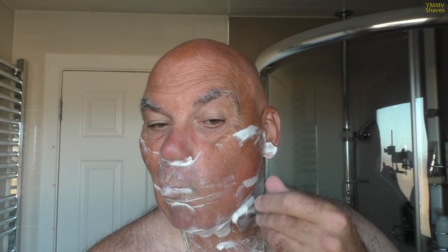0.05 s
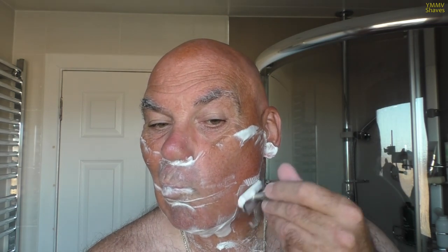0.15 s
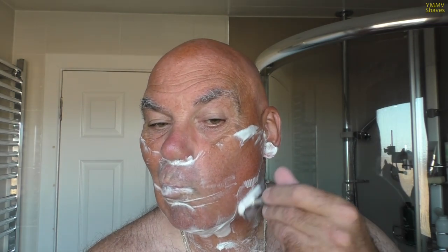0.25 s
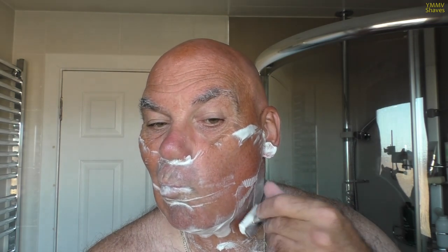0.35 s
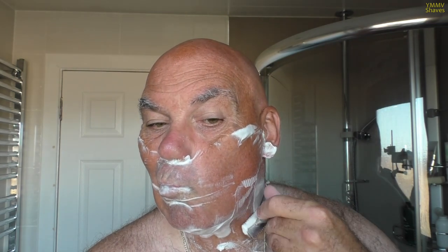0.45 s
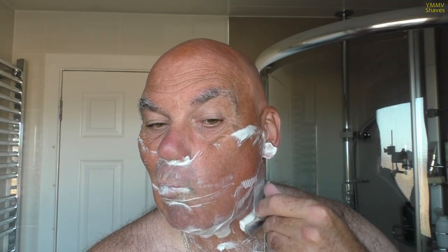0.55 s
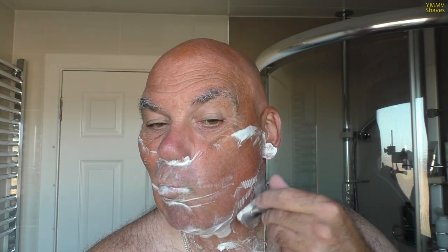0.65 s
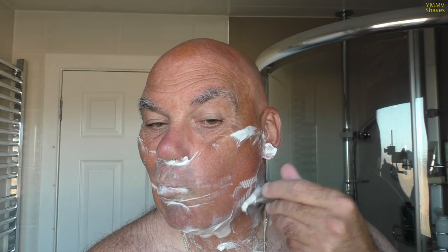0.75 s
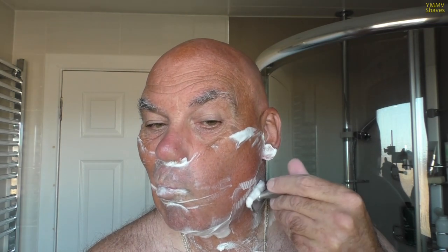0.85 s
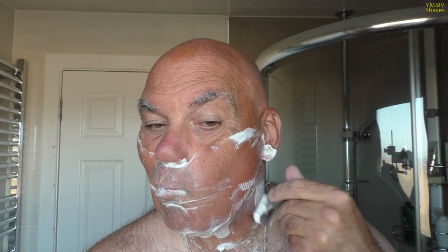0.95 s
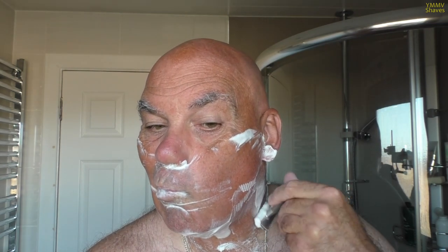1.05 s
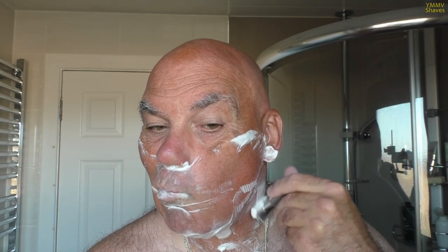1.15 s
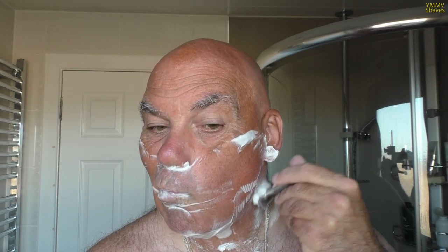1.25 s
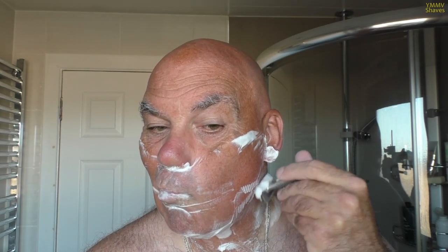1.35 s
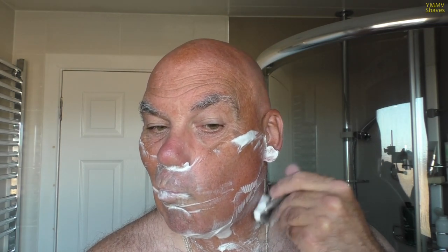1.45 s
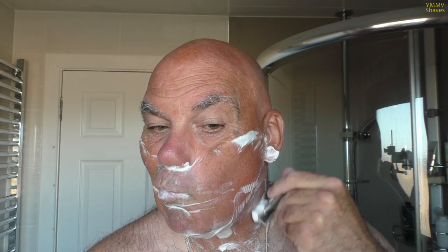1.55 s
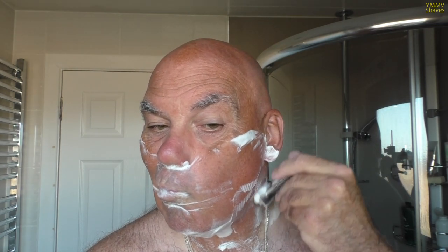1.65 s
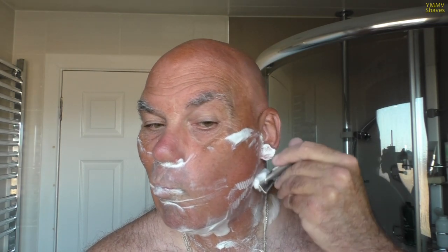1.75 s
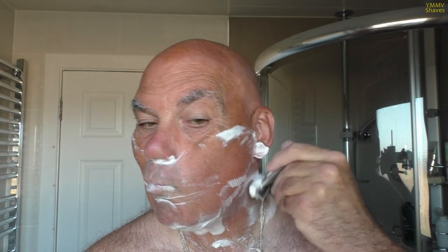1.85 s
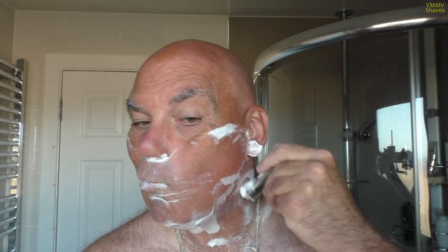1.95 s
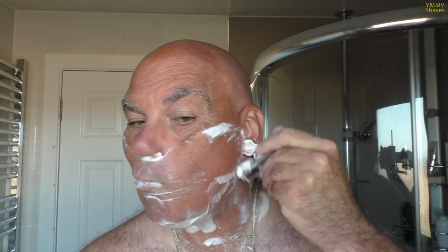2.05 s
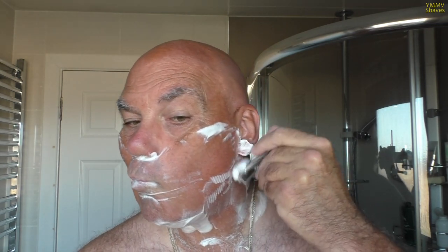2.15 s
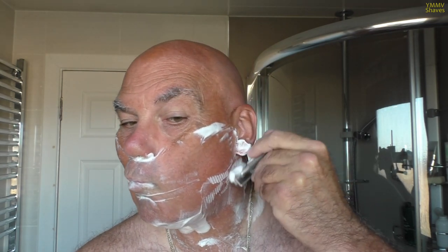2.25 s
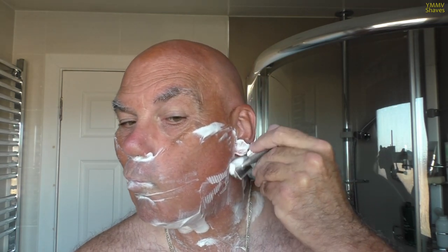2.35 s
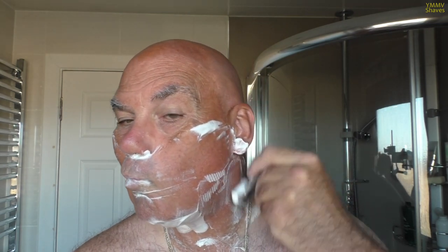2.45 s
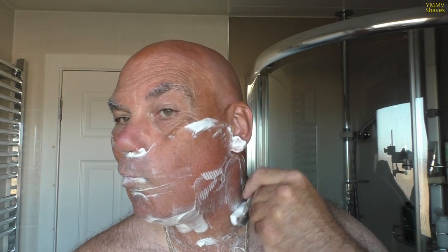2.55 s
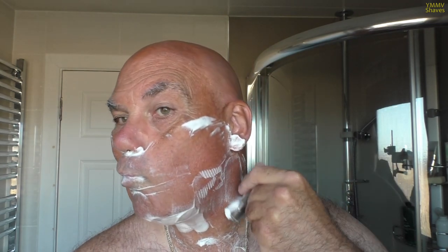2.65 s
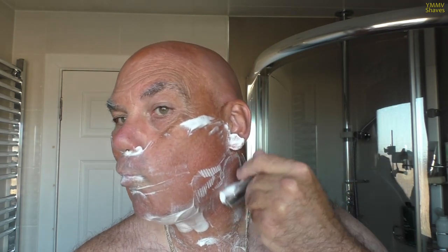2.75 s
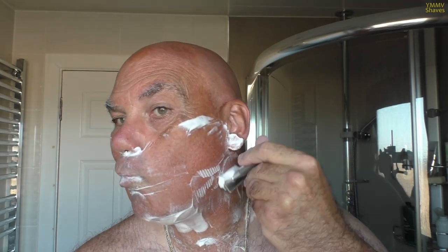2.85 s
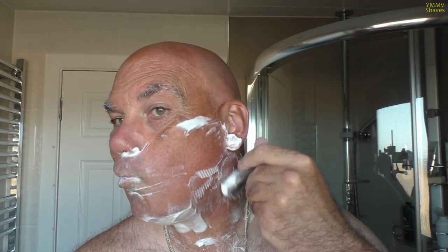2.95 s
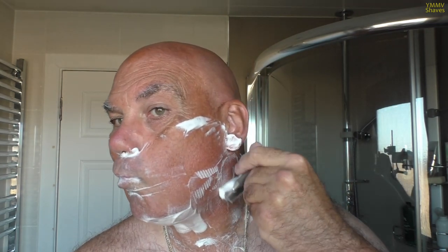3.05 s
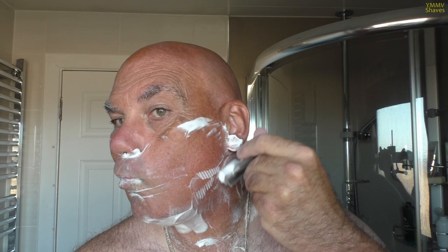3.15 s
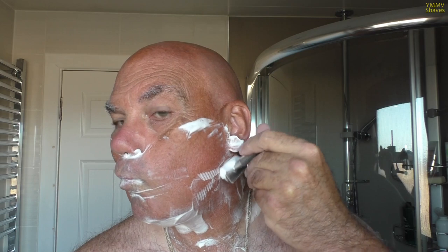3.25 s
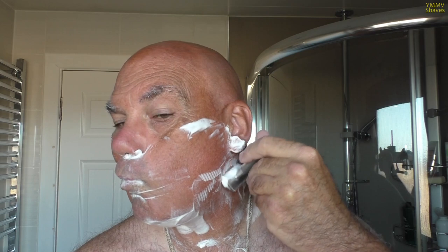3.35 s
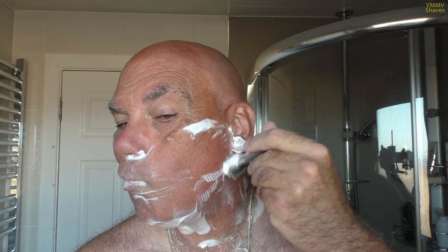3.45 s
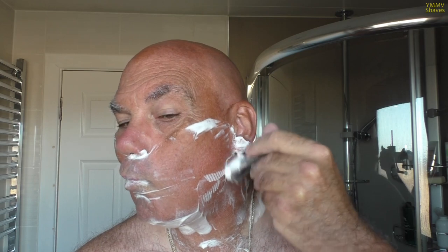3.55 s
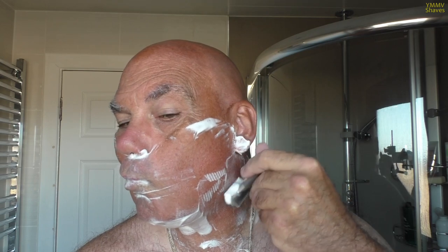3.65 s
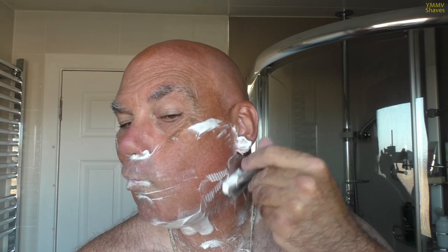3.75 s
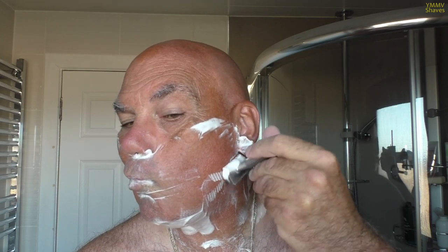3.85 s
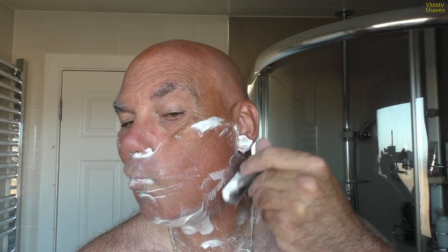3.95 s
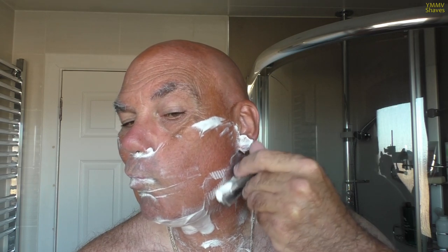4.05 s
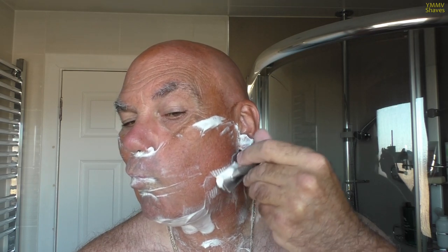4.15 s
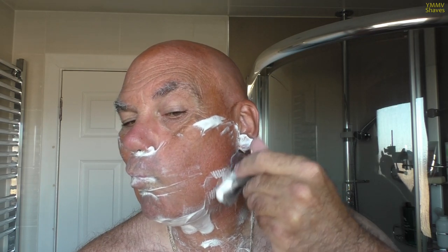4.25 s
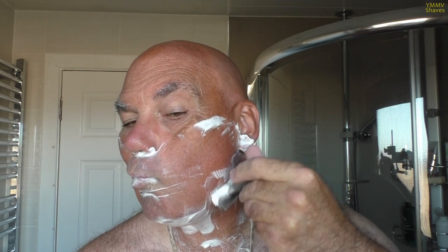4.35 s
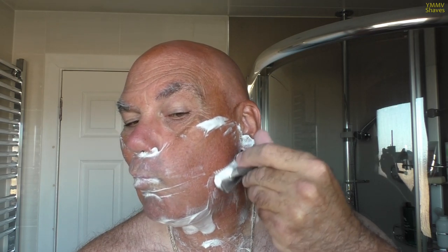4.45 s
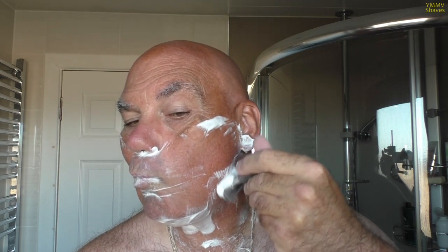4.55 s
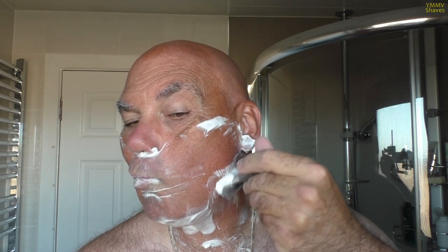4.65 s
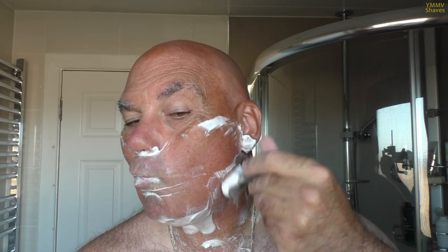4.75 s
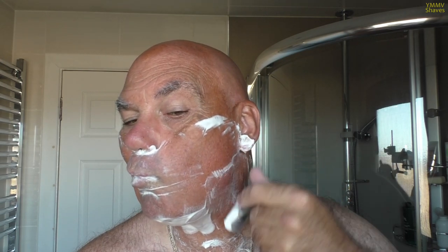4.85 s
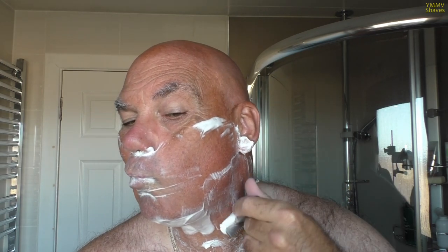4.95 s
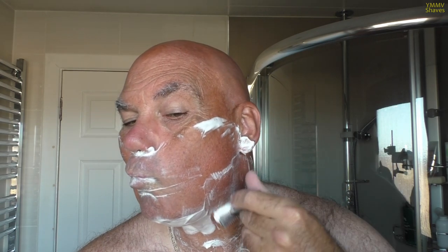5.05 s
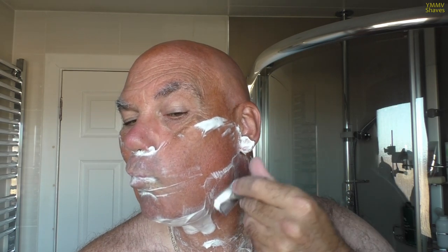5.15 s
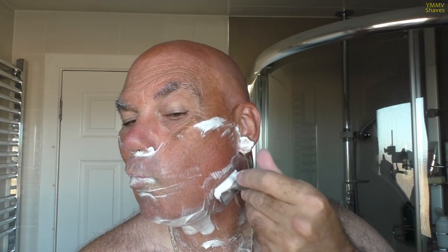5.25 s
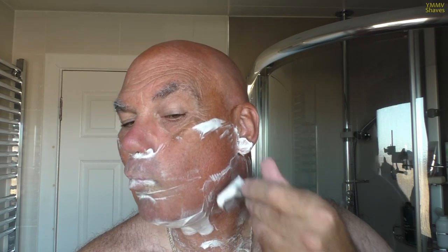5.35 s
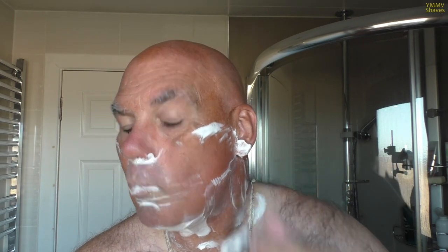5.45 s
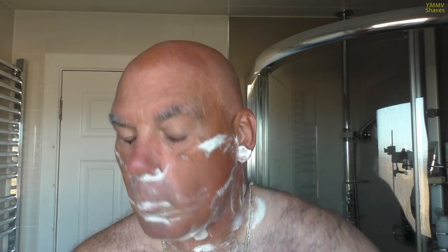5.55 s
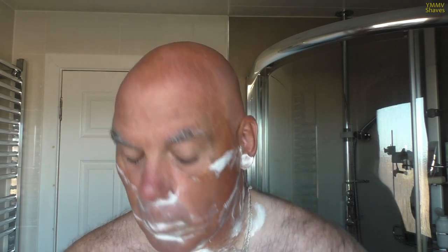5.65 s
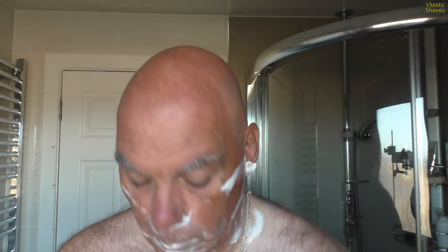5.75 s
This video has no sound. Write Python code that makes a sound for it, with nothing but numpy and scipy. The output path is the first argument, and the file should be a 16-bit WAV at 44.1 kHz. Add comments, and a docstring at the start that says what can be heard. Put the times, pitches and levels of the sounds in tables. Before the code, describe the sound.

A razor scrapes lathered stubble in short strokes over a low hum, then a tap runs with a pipe knock.

```python
"""Wet shave in a tiled bathroom

Over a low ventilation hum, a safety razor scrapes through lathered stubble in short strokes.
Hairs snap in a dense crackle that rings the blade, and the lather smacks as the razor lands and lifts.
At the end a tap is opened: the valve whistles, the pipe knocks and water drums into the basin."""
import sys
import numpy as np
from scipy import signal
from scipy.fft import rfft, irfft
from scipy.io import wavfile

SR = 44100
rng = np.random.default_rng(int(sys.argv[2]) if len(sys.argv) > 2 else 0)


def master(y):
    """Save y as 16-bit WAV."""
    cut = np.clip(np.atleast_2d(y).T, -1, 1)
    pcm = np.round(cut * 32767)  # scale
    wavfile.write(sys.argv[1], SR, pcm.astype(np.int16))


N = 256220
TIME = np.arange(N) / SR


def amp(db):
    """Amplitude ratio: a factor of ten for every 20 dB."""
    return 10 ** (np.asarray(db) / 20)


def unit_rms(x):
    """Normalisation to unit mean power."""
    return x / np.sqrt(np.mean(x ** 2) + 1e-20)


def value_at(curve, hz):
    """Interpolation on a logarithmic frequency axis."""
    f, value = np.transpose(curve)
    return np.interp(np.log(hz + 1), np.log(f + 1), value)


def add(mix, start_s, sound):
    """Superposition: a sound adds to the mix from its onset."""
    part = mix[round(start_s * SR):][:len(sound)]
    part += sound[:len(part)]


def colour(x, spectrum, tilt_db=0, size=4096):
    """Minimum-phase filtering at unit energy, with a treble tilt in dB per octave."""
    hz = abs(np.fft.fftfreq(size, 1 / SR))
    log_gain = np.log(amp(value_at(spectrum, hz) + tilt_db * np.log2(1 + hz / 1000)))
    taps = np.fft.ifft(np.exp(np.conj(signal.hilbert(log_gain)))).real
    return signal.fftconvolve(x, taps / np.linalg.norm(taps))[:len(x)]


def wander(cutoff_hz):
    """Low-passed noise: a smooth random fluctuation of unit power."""
    hz = np.fft.rfftfreq(N, 1 / SR)
    return unit_rms(irfft(rfft(rng.standard_normal(N)) / (1 + (hz / cutoff_hz) ** 4), N))


def crackle(per_s, spread_db):
    """Shot noise: impulses at random moments, most small and a few large."""
    size = amp(spread_db * np.minimum(rng.exponential(1, N), 4))
    return unit_rms(size * rng.choice([-1, 1], N) * (rng.random(N) < per_s / SR))


def resonate(x, hz, width_hz):
    """Forced resonance: two equal two-pole stages in cascade, scaled to unit power."""
    radius = np.exp(-np.pi * width_hz / SR)
    zeros, poles = [1, 0, -1], [1, -2 * radius * np.cos(2 * np.pi * hz / SR), radius ** 2]
    return unit_rms(signal.lfilter(zeros, poles, signal.lfilter(zeros, poles, x)))


def ring(modes, t):
    """Free vibration: damped modes sum after a blow, scaled to unit peak."""
    sound = sum(amp(db) * np.exp(-np.log(1000) * t / t60) * np.sin(2 * np.pi * hz * t)
                for hz, db, t60 in modes)
    return sound / abs(sound).max()


# Reverberation time of the room: f/Hz, T60/s
ROOM_DECAY = [(200, 0.89), (1000, 0.3), (4000, 0.3), (9000, 0.36), (16000, 0.26)]

def bathroom(x, wet_db):
    """Reverberation: dense reflections off tile and glass, the bass lasting longest."""
    count = SR // 2
    reflections = rng.standard_normal(count) * (rng.random(count) < 5000 / SR) * (TIME[:count] > 0.003)
    hz, t, spectra = signal.stft(reflections, SR, nperseg=256)
    decay = np.exp(-np.log(1000) * t / value_at(ROOM_DECAY, hz)[:, None])
    tail = signal.istft(spectra * decay, SR)[1]
    wet = signal.fftconvolve(x, tail / np.linalg.norm(tail))[:N]
    return (x + amp(wet_db) * wet) / np.sqrt(1 + amp(wet_db) ** 2)


# Spectra of the ventilation hum and of the hiss above it: f/Hz, relative level/dB
HUM_SPECTRUM = [(12, -62), (20, -26), (188, 0), (232, 0), (298, -1.5), (394, -5.5), (463, -13),
                (578, -30.5), (680, -41.5), (880, -51.5), (1500, -120)]
HISS_SPECTRUM = [(450, -21.5), (700, 1), (1000, 1), (1850, 1.5), (2150, -2), (2400, 2), (2750, -7),
                 (3000, 1), (3500, -8), (4800, -5.5), (6100, -8), (10000, -1.5), (12500, -4.5),
                 (16000, -8.5)]

def ventilation():
    """Flow noise: air rumbles in the ventilation, wavering slightly under a faint even hiss."""
    hum = colour(rng.standard_normal(N), HUM_SPECTRUM) * amp(1.27 * wander(cutoff_hz=9.2))
    hiss = bathroom(colour(rng.standard_normal(N), HISS_SPECTRUM), wet_db=-11)
    return amp(-52) * hum + amp(-66.5) * hiss


# Spectra of snapping hair, fizzing lather and dragging skin: f/Hz, relative level/dB
RASP_SPECTRUM = [(1500, -40.5), (2100, -36), (2650, -4.5), (3050, 0.5), (3750, 1), (4300, 3.5), (4950, 3),
                 (5500, -2), (6300, -2), (7500, -12.5), (10000, -27), (16000, -35)]
FIZZ_SPECTRUM = [(2500, -35), (5000, -6.5), (6900, 1.5), (7600, 0.5), (8400, 0), (9100, -0.5), (10200, 0.5),
                 (11200, -3), (12500, -5), (14000, -13), (16000, -9.5)]
DRAG_SPECTRUM = [(300, -45), (700, -14.5), (1100, -4), (1500, 0.5), (1900, -2), (2350, 5.5), (2700, 4),
                 (3500, -31), (8000, -55)]
# Strokes: landing t/s, pressing t/s, easing t/s, level/dB, swell/dB, sag/dB, bite/dB, fizz gain/dB,
# fall of fizz/dB, drag gain/dB, blade gain/dB, head resonance f/Hz, head gain/dB
RAZOR_STROKES = [ (0.053, 0.049, 0.044, -45.5, 9, 4, 1, -1.5, 10, -13, -18, 5800, -14),
                 (0.580, 0.13, 0.12, -48, 13.5, 6.5, 1.5, -4, 5, -17.5, -11.5, 3150, -13),
                 (1.135, .118, 0.037, -51, 20.5, 0, 1, -4, 5, -12.5, -17, 2600, -7),
                 (1.574, 0.082, 0.08, -51, 19.5, 2, 0.5, -3, 11, -5.5, -24, 1870, -14),
                 (1.986, 0.1, 0.026, -50, 3.5, 3, 3.5, -2, 2, -16, -19, 5300, -12),
                 (2.268, 0.051, 0.017, -49.5, 24, 3, 1, -4.5, 3, -9.5, -24, 6050, -9),
                 (2.627, 0.15, 0.075, -55, 15.5, 4, -0.5, 2.5, -8, -6.5, -29, 2050, -16),
                 (3.076, .108, 0.019, -49.5, 7.5, 4, 0.5, -5, 8, -10.5, -11, 4200, -17),
                 (3.395, 0.056, 0.025, -46.5, 18.5, 4, 1.5, -6.5, -4, -12, -15, 5030, -14),
                 (3.738, 0.085, 0.014, -49, 5, 8, 2.5, -2.5, 6, -13, -6, 4360, -10),
                 (4.055, 0.064, 0.081, -52.5, 7.5, 6.5, 0.5, -5.5, 7, -7, -16, 4500, -40),
                 (4.357, .110, 0.013, -51.5, 8.5, 5, 3, -4, 6, -10, -6.5, 2660, -8),
                 (4.674, 0.017, 0.0094, -58.5, 8, 4, 1, 0.5, 13, -7.5, -10, 5050, -24),
                 (5.003, 0.1, 0.14, -47.5, 19, 3.5, 3, -0.6, 12.5, -11, -13, 4830, -23), ]

def razor(attack_s=0.0043, release_s=0.022, bite_s=0.019, touch_s=0.012, glide_s=0.17):
    """Fracture and friction: snapping hairs ring blade and head, skin drags and lather fizzes."""
    clumps = amp(0.81 * wander(cutoff_hz=100))
    hairs = unit_rms(clumps * crackle(per_s=3000, spread_db=1.5))
    rasp = amp(-1.5) * colour(hairs, RASP_SPECTRUM)
    fizz = colour(unit_rms(clumps * crackle(per_s=6600, spread_db=2.5)), FIZZ_SPECTRUM)
    drag = amp(1.5) * colour(crackle(per_s=2500, spread_db=4.5), DRAG_SPECTRUM)
    skim = rasp + amp(-2) * fizz + amp(-6.5) * drag
    blade = resonate(hairs, hz=3826, width_hz=330)
    out = np.zeros(N)
    for (start_s, press_s, ease_s, db, swell_db, sag_db, bite_db,
         fizz_db, cleared_db, drag_db, blade_db, head_hz, head_db) in RAZOR_STROKES:
        length_s = press_s + ease_s
        now = (TIME >= start_s - 0.04) & (TIME < start_s + length_s + 2 * glide_s)
        t = TIME[now] - start_s
        lifted_s = np.maximum(t - length_s, 0)
        contact = np.exp(-lifted_s / release_s) / (1 + np.exp(-t / attack_s))
        bite = bite_db * np.exp(-((t - press_s) / bite_s) ** 2)  # the blade cuts deepest
        pressure = contact * amp(np.interp(t, [0, press_s, length_s], [-swell_db, 0, -sag_db]) + bite)
        lather = amp(fizz_db + cleared_db * (0.5 - np.clip(t / length_s, 0, 1)))
        metal = amp(blade_db) * blade[now] + amp(head_db) * resonate(hairs[now], head_hz, width_hz=650)
        cut = pressure * (rasp[now] + metal + lather * fizz[now])
        skin = pressure ** 0.88 * amp(drag_db) * drag[now]
        # The guard brushes the skin before the stroke; afterwards the razor glides lightly back.
        touch = amp(-71) * np.exp(-(t / touch_s) ** 2)
        glide = amp(-69.5) * (1 - np.exp(-lifted_s / release_s)) * np.exp(-(lifted_s / glide_s) ** 2)
        add(out, start_s + t[0], amp(db) * (cut + skin) + (touch + glide) * skim[now])
    return out


# Spectrum of a breaking lather film: f/Hz, relative level/dB
SMACK_SPECTRUM = [(1000, -34), (2500, -17.5), (4000, 0.5), (6000, -2), (8000, 0), (10000, 3.5), (12000, -2),
                  (16000, -18.5)]
# Smacks: onset t/s, relative level/dB, decay t/s, tilt/(dB per octave)
LATHER_SMACKS = [(0.05, -52.5, .018, -5), (0.196, -49, .001, 2), (0.274, -59.5, 0.015, -4),
                 (0.559, -47, 0.0047, 7), (0.895, -54, 0.012, 0.5), (1.196, -61, 0.012, 12),
                 (1.373, -58, .003, 10), (1.837, -55, 0.019, -2), (1.858, -57.5, .018, 10),
                 (2.18, -60.5, .02, 0), (2.294, -62, .003, 0), (2.771, -49.5, 0.011, -2),
                 (3.077, -45.5, .01, 8), (3.294, -57.5, .009, -5), (3.403, -53, .004, -4),
                 (3.721, -50.5, .008, 1), (3.735, -48, 0.017, 6), (4.09, -51.5, .009, 5),
                 (4.255, -60.5, .014, -6), (4.35, -56, .007, -6), (4.676, -50, 0.0024, -1),
                 (4.945, -50, .0012, 2), (4.998, -54, 0.0056, -2), (5.023, -46, .001, -8),
                 (5.042, -49, .001, 1), (5.231, -49, 0.0086, 3)]

def lather_smacks():
    """Film rupture: lather breaks with one snap and an exponentially dying crackle."""
    out, t = np.zeros(N), TIME[:SR // 6]
    for start_s, db, decay_s, tilt_db in LATHER_SMACKS:
        burst = crackle(per_s=2500, spread_db=2.5)[:len(t)] * np.exp(-t / decay_s)
        burst[0] += 4.5  # the snap
        burst *= np.sqrt(decay_s * SR / 2) / np.linalg.norm(burst)
        add(out, start_s, amp(db) * colour(burst, SMACK_SPECTRUM, tilt_db))
    return amp(4) * out


# Resonances of the valve, and of the pipe and basin: f/Hz, width/Hz, relative level/dB
VALVE_RESONANCES = [(2318, 130, 0), (2360, 180, -23), (2764, 93, -5)]
BASIN_RESONANCES = [(1153, 110, 1.5), (1318, 88, 1.5), (1470, 120, -5), (1900, 190, -8), (3800, 88, -15),
                    (4270, 93, -12), (4610, 97, -6.5), (4800, 240, -10.5), (5770, 260, -14)]
# Spectrum of the splashing: f/Hz, relative level/dB
SPLASH_SPECTRUM = [(600, -4.5), (1300, -5), (1900, 0.5), (2550, 8.5), (3100, -5), (3700, -2), (4600, -7),
                   (5600, -15), (8500, -11), (16000, -22)]
# Pressure surges: centre t/s, whistle gain/dB, splash gain/dB, half-length t/s
PRESSURE_SURGES = [(5.435, 1, 0, .018), (5.508, 1, 4, 0.018), (5.545, 9.5, -1, 0.011),
                   (5.619, 13, -1, 0.022), (5.80, 8.5, 4, 0.049)]

def running_water(opens_s=5.422, flutter_db=2):
    """Random excitation of resonances: eddies whistle in the valve; drops drum and splash in the basin."""
    def build_up(full_db, rise_db, rise_s):
        """Onset: the level climbs linearly in decibels as the tap opens."""
        t = TIME - opens_s
        return amp(full_db + np.interp(t, [0, rise_s], [-rise_db, 0])) * (t > 0)

    whistle = build_up(full_db=-56, rise_db=4.1, rise_s=0.11)
    drumming = build_up(full_db=-52.5, rise_db=16, rise_s=0.13)
    splash = build_up(full_db=-54.5, rise_db=31, rise_s=0.11)
    for centre_s, whistle_db, splash_db, half_s in PRESSURE_SURGES:
        surge = np.exp(-((TIME - centre_s) / half_s) ** 2)
        whistle *= amp(whistle_db * surge)
        splash *= amp(splash_db * surge)
    eddies = rng.standard_normal(N) * amp(flutter_db * wander(cutoff_hz=18))
    drops = crackle(per_s=3500, spread_db=5.5)
    whistle *= unit_rms(sum(amp(db) * resonate(eddies, hz, width) for hz, width, db in VALVE_RESONANCES))
    drumming *= unit_rms(sum(amp(db) * resonate(drops, hz, width) for hz, width, db in BASIN_RESONANCES))
    splash *= colour(crackle(per_s=2700, spread_db=3), SPLASH_SPECTRUM)
    return whistle + drumming + splash


# Modes of the basin's mounting and of the tap: f/Hz, relative level/dB, T60/s
MOUNTING_MODES = [(70, -8, 0.36), (186, -2, 0.53), (283, 0, 0.54), (359.4, 5.5, 0.86), (449, 3.5, 0.19)]
TAP_MODES = [(883, -11, 0.1), (1023, 5.5, 0.04), (1103, 2.5, 0.073), (1403, 5.5, 0.06), (1480, 3, 0.07),
             (2348, 6.5, 0.088), (2660, -22, .06)]
# Knocks of the pipe: onset t/s, thud level/dB, rattle level/dB, rattle delay t/s
PIPE_KNOCKS = [(5.423, -35.5, -48, 0.00094), (5.5817, -21, -23, 0.0052), (5.612, -38, -27, 0.001985),
               (5.62, -42, -26, 0.00283)]

def pipe_knocks(push_hz=272, push_s=0.00458, boom_db=-11, bloom_s=0.023):
    """Impulse response: each spurt shoves the basin, which booms briefly while the tap rattles."""
    out, t = np.zeros(N), TIME[:SR // 3]
    pulse = np.exp(-2 * (t / push_s - 1) ** 2) * np.tanh(t / 0.0007)
    push = -np.cos(2 * np.pi * push_hz * (t - push_s)) * pulse
    thud = push + amp(boom_db) * ring(MOUNTING_MODES, t) * (1 - np.exp(-t / bloom_s))
    bass_cut = signal.butter(6, 820, "highpass", fs=SR, output="sos")
    rattle = signal.sosfilt(bass_cut, ring(TAP_MODES, t))  # thin and bright above the low thud
    for start_s, thud_db, rattle_db, delay_s in PIPE_KNOCKS:
        add(out, start_s, amp(thud_db) * thud)
        add(out, start_s + delay_s, amp(rattle_db) * rattle)
    return out


def scene():
    """Superposition: the sources and their reverberation sum in one channel."""
    shave = bathroom(razor(), wet_db=-6.5) + bathroom(lather_smacks(), wet_db=0)
    tap = bathroom(running_water(), wet_db=-12) + bathroom(pipe_knocks(), wet_db=-5)
    return (ventilation() + shave + tap)[None]


def record(dry):
    """Band limiting: a linear-phase low-pass filter removes the highest treble."""
    low_pass = signal.firwin(511, cutoff=15850, window=("kaiser", 9), fs=SR)
    return signal.oaconvolve(dry, low_pass[None], "same")


dry = scene()
out = record(dry)
master(out)
```